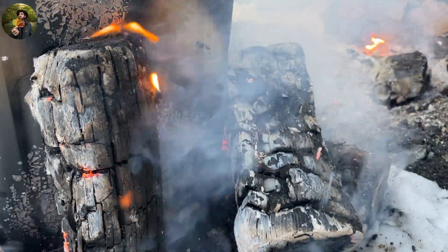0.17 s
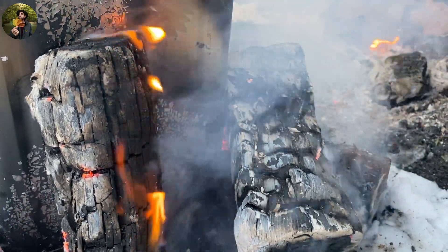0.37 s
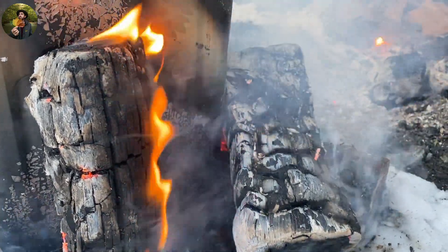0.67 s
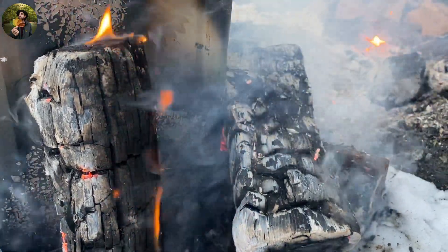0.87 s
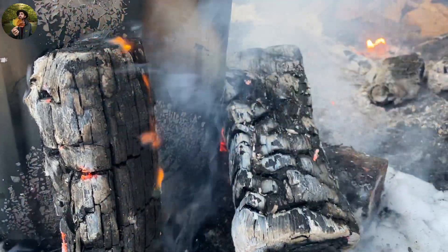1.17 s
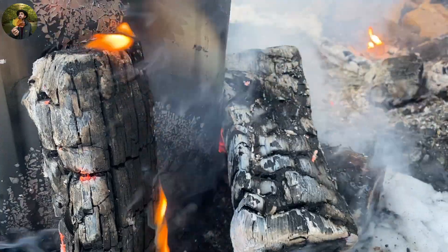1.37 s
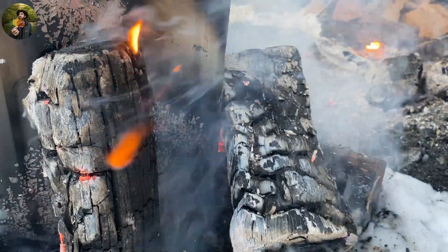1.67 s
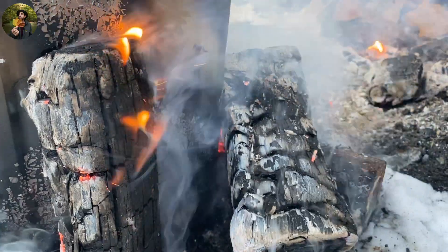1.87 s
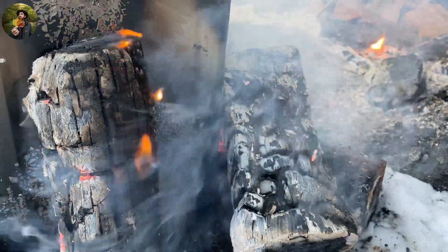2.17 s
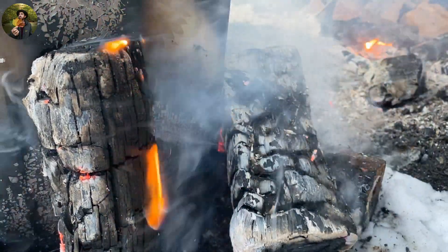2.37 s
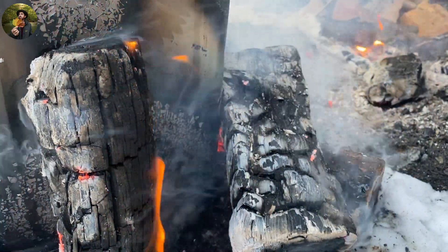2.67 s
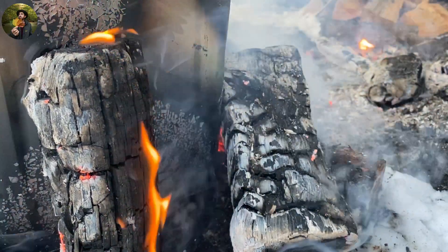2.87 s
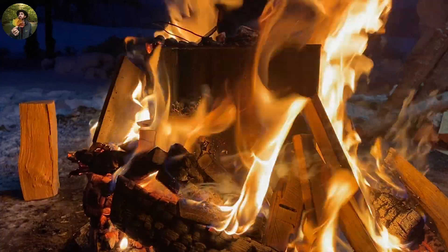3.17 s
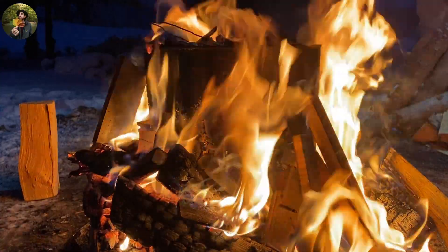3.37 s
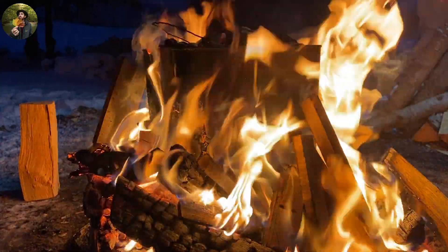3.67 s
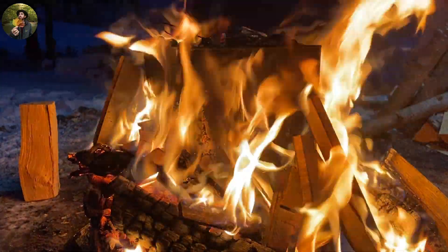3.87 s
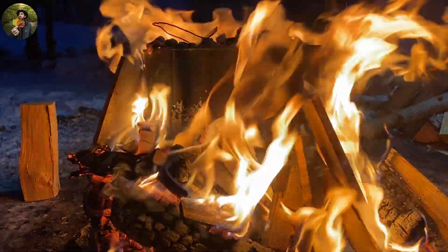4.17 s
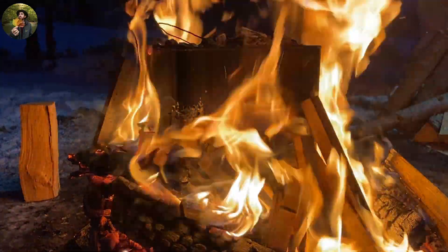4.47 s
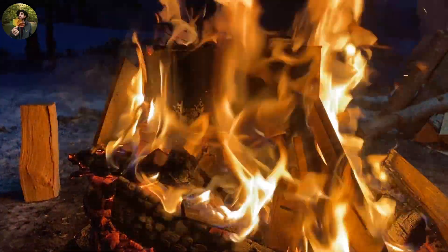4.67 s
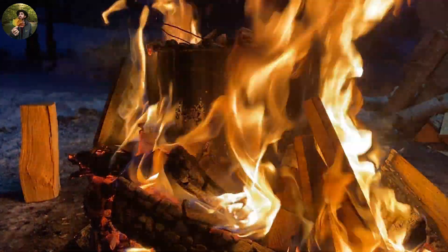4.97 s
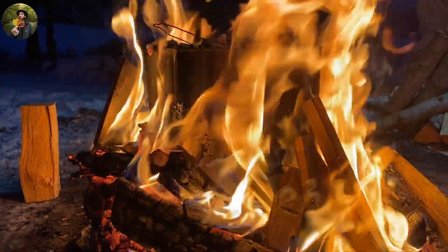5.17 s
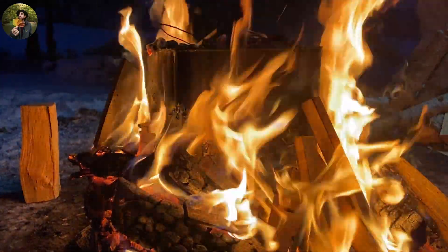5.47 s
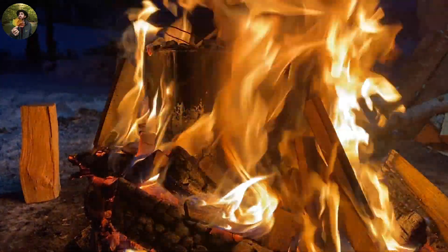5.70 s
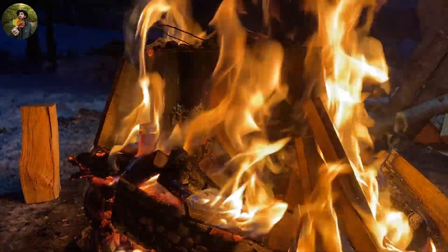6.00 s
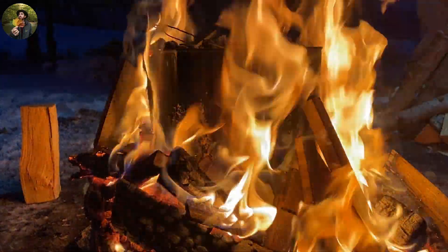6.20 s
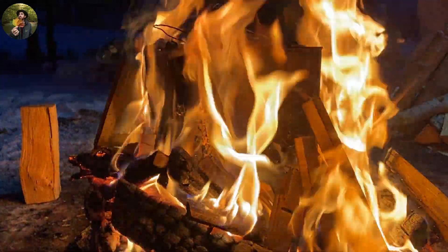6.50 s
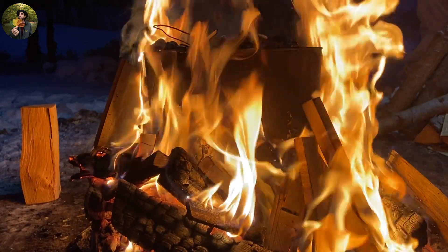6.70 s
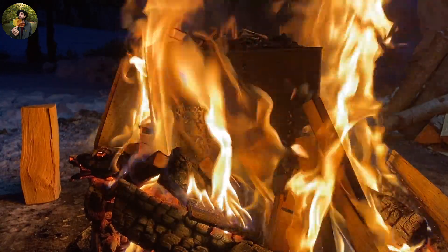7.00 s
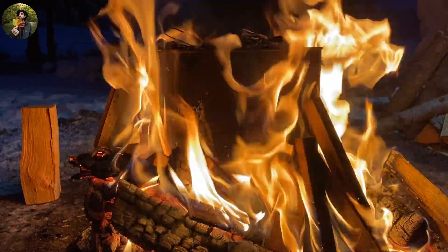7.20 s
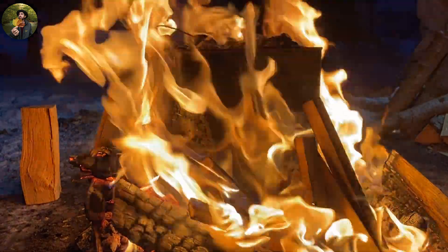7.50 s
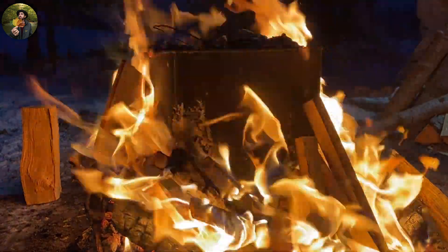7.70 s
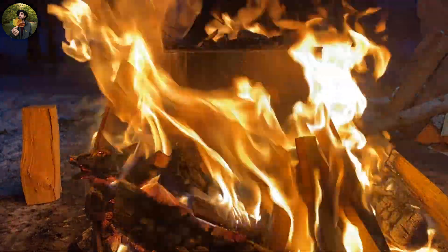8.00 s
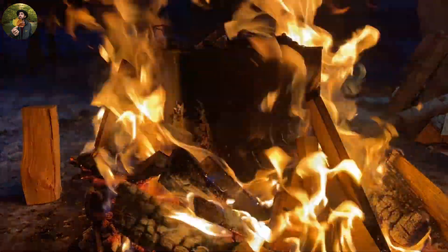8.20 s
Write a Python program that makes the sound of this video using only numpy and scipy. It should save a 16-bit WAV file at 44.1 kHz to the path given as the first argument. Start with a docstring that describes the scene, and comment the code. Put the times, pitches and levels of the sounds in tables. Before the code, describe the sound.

A wood fire outdoors, heard very close in stereo, in two parts. From 0 to 3.1 seconds charred logs smoulder: faint airy sizzling with tiny fizzing ticks, and small flames that flare and die in soft low flutters and short flaps. Deep puffs bunch around 0.8 to 1.1 seconds, the strongest low thumps of this part. Thin, dry, bright snaps come sparsely, with a clear cluster near 1.5 and others at 2.2 to 2.5. At 3.1 it cuts abruptly to a full blaze: a continuous deep, throbbing rumble with quick flutter and stronger hiss. Sharp millisecond cracks come often, notably at 3.8, 4.8, 5.15, 5.7, 6.8 and 8.1, some with hollow woody pops, especially 4.85 and 5.15. Heavy bass puffs swell around 6.1 and from 6.7 to 7.3. The hiss surges near 7.4 and 8.1; the blaze continues to the end, about 8.4. Dry, with only slight close reflections.

```python
"""A wood fire outdoors, close up: small flames flutter on charred, smouldering logs; a cut leads to a full blaze.
Flames are filtered noise: a throbbing rumble, a flickering flutter, torn flaps and puffs of one push and pull.
Fibres snap as millisecond noise bursts, with an echo and scatter; pops ring the modes of the hollow between logs.
Behind them sap hisses and fizzes, and the draught keeps the hollow faintly ringing.
Two microphone ports a few centimetres apart pick it up."""
import sys
import numpy as np
from scipy import signal
from scipy.fft import rfft, irfft
from scipy.io import wavfile
from scipy.ndimage import uniform_filter1d

SR = 44100
rng = np.random.default_rng(int(sys.argv[2]) if len(sys.argv) > 2 else 0)


def wav_record(signal):
    """Record a signal, one row per channel, as 16-bit PCM in the file named by sys.argv[1]."""
    frames = np.transpose(np.atleast_2d(signal))
    bounded = np.clip(frames, -1, 1)
    # unit amplitude maps onto the largest positive 16-bit level
    quanta = np.round(bounded * 32767).astype(np.int16)
    wavfile.write(sys.argv[1], SR, quanta)


N = 368182

CUT_S = 3.117  # smoulder before, blaze after
RECORDER_EDGE_HZ, STEAM_EDGE_HZ = 16700, 15850
FLARE_RISE_S, FLARE_FALL_S = 0.019, 0.023
EMBER_RUMBLE_DB, EMBER_FLUTTER_DB = -56.5, -68.5  # left between flares, before trim
TEARING_DB, TEARING_DRIFT_DB_PER_S = -11.5, -0.68  # blaze flutter re flame size, before trim; eases as it settles
SMOULDER_STEAM_DB = -63.5  # before the hiss and fizz trims
TIME_S, BIN_HZ = np.arange(N) / SR, np.fft.rfftfreq(N, 1 / SR)

# Steam from the blazing wood. Each row: time in seconds, level in dB before the hiss and fizz trims.
BLAZE_STEAM = [(3.13, -61.5), (3.48, -59.5), (4.66, -58.5), (5.5, -60.7), (6.6, -56.5), (7.08, -58.6),
               (7.37, -54.5), (7.93, -60), (8.11, -54.5), (8.35, -64)]
# Colour of rumble, flutter and hiss. Each row: frequency in Hz, relative level in dB per Hz.
SMOULDER_RUMBLE = [(15, -38), (30, -26), (50, -2.5), (80, -0.5), (125, -5), (180, -14.5), (260, -28),
                   (500, -67)]
BLAZE_RUMBLE = [(15, -50), (28, -27), (45, -4.5), (72, 0.5), (105, -4.5), (150, -8), (220, -17),
                (330, -27.5), (700, -65)]
SMOULDER_FLUTTER = [(100, -6), (190, 1), (300, -4), (420, -10.5), (600, -20), (900, -49), (2000, -55),
                    (4000, -61)]
BLAZE_FLUTTER = [(120, 1), (250, 0), (370, -1.5), (500, -6.5), (650, -10.5), (900, -13.5), (1400, -22),
                 (2500, -33), (5000, -65)]
SMOULDER_HISS = [(400, -4.5), (1000, -12), (2000, -7), (3000, -2.5), (4800, -1), (6200, 1), (7500, -2),
                 (9500, 1), (11500, -2.5), (15700, -1), (16100, -30)]
BLAZE_HISS = [(400, 7), (1400, -4), (2100, -3.5), (3300, 0.5), (4000, -1.5), (4800, 2), (6200, -4.5),
              (7700, 0.5), (9000, -2), (12000, -0.5), (15600, 0.5), (16100, -21)]
# Loud snaps of splitting fibres. Each row: time in seconds, level in dB before trim, ring in Hz,
# body under 3 kHz in dB, sizzle over 8 kHz in dB, decay in seconds.
LOUD_CRACKS = [(0.089, -41.5, 8100, -7.5, -3.5, 0.0007), (0.3095, -45.5, 6150, -20, 1, .0016),
               (0.3742, -43, 15300, -21, 7, .001), (0.8765, -38.5, 7700, -26, -2, 0.00062),
               (1.270, -41.5, 12600, -21, 8, .004), (1.5128, -42.5, 10200, -6, 9, .002),
               (1.5273, -34, 5240, -11, 2, 0.00071), (1.5603, -43.5, 3960, -6, -9, 0.0015),
               (2.1806, -38, 6740, -7, 5, 0.00054), (2.34, -40.5, 8150, -41, 5, 0.00057),
               (2.452, -47.5, 8400, -26, 0, .0012), (2.9077, -46.5, 12000, -13, 2, 0.0014),
               (3.3472, -31.5, 5640, 8, 2, 0.00048), (3.4025, -38.5, 13600, 10, 12, 0.00089),
               (3.779, -28.5, 2750, 1.5, 1.5, 0.00079), (4.0346, -42, 6900, -3, -1, .0013),
               (4.0704, -32.5, 15300, 4, -4, 0.00057), (4.2773, -44, 15200, 1, 21, 0.00045),
               (4.4142, -42, 9500, -15, 3, .0008), (4.29, -43, 4300, 5, -3, .0008),
               (4.501, -36.5, 14800, 6.5, .5, 0.00047), (4.8217, -44, 13400, -1, 2, .0006),
               (4.8359, -27.5, 15300, -0.5, 7.5, 0.00054), (4.8568, -40, 7000, 0, -5, 0.0056),
               (5.1451, -31.5, 3800, -1, -16, 0.0026), (5.1469, -33.5, 3100, 3, -1.5, .0021),
               (5.2587, -35.5, 12300, -3, 3.5, .0012), (5.3882, -43, 4700, 2, -2, .0008),
               (5.7301, -32, 13700, -1.5, 2.5, .0004), (5.7477, -35, 15000, -7, 8, .0006),
               (5.9513, -40.5, 9700, -10, 0, .001), (6.0769, -40, 15000, -2, 0.5, 0.0011),
               (6.2226, -41.5, 4100, -2, -10, .0036), (6.2712, -45.5, 4630, -3, -2, .001),
               (6.379, -39, 12200, -14, 1, 0.00085), (6.4516, -43.5, 6830, -2, -7, 0.00091),
               (6.5273, -40.5, 2580, 4, -5, 0.0017), (6.8062, -27, 13400, 0, 4, 0.00062),
               (6.8593, -39.5, 11600, 0, 5, 0.00062), (7.1517, -41.5, 4970, 1, 2, 0.00097),
               (7.455, -42.5, 2600, 6, 8, 0.00088), (7.7846, -42.5, 3300, 6, -13, 0.0056),
               (8.1038, -29.5, 13000, 5.5, -1, 0.00045)]
# Gas pockets flaring up. Each row: time in seconds, peak in dB before trim, pitch in Hz.
PUFFS = [(0.817, -29.5, 72), (.92, -25, 70), (0.97, -22, 84), (1.082, -26, 78), (1.106, -31, 110),
         (1.319, -31.5, 220), (2.331, -34, 420), (2.868, -35, 148), (3.354, -27, 76), (4.345, -28, 80),
         (6.07, -25.5, 90), (6.66, -22, 83), (6.9263, -20, 74), (7.155, -29, 74), (7.2656, -21, 71.5),
         (8.252, -28.5, 87)]
# Pops deep in the pile. Each row: time in seconds, level in dB before trim, centre in Hz,
# fall away from the centre in dB per octave.
POPS = [(2.07, -53.5, 3100, 20), (3.575, -44, 1170, 13), (3.7787, -57, 1200, 13), (4.8493, -40.5, 1000, 9),
        (4.858, -31.5, 970, 11), (5.1455, -31, 900, 0), (6.223, -46, 1800, 0), (6.528, -50, 1210, 15),
        (7.195, -49, 1650, 14), (8.104, -51, 887, -1)]
# Modes of the hollow between the logs. Each row: frequency in Hz, level in dB, t60 in seconds.
HOLLOW_MODES = [(622, -8.5, 0.044), (719, -4, 0.057), (1004, -1, 0.042), (1226, -5, 0.043),
                (1744, -14.5, 0.075), (1905, -17, 0.048), (2597, -7.5, 0.046), (3464, -2, 0.019),
                (3950, -0.5, 0.014)]
# The two ports. Each row: frequency in Hz, likeness 0-1, left lead in radians, left over right in dB.
PORTS = [(100, .96, 0, 0), (300, .92, 0, -1.2), (1000, .7, .3, 1.2), (2000, .45, .6, 2.8),
         (3300, .45, .6, 2.8), (5000, .3, .6, 1.6), (6800, .65, .1, .3), (7600, .7, -.8, .8),
         (9000, .95, -3.1, 0), (11000, .95, -6.2, 0), (11700, .7, -6.8, 0), (13300, .95, -9.4, 0),
         (15200, .92, -12.5, 0)]
# Flaps and short whooshes of the small flames that stand out. Each row: time in seconds, level in dB,
# length in seconds, reach in Hz.
CLEAR_FLAPS = [(.424, -47, 0.011, 563), (.546, -57, 0.042, 1100), (.619, -63, .09, 850),
               (.702, -57, .02, 854), (.935, -53.5, .015, 494), (1.322, -43, .011, 503),
               (1.352, -49.5, 0.018, 700), (1.581, -50.5, 0.012, 560), (1.781, -57, 0.0078, 1100),
               (1.824, -59, .01, 1110), (1.924, -57.5, 0.011, 1250), (2.115, -55.5, 0.013, 1050),
               (2.262, -51, .012, 590), (2.308, -46.5, 0.0088, 800), (2.331, -43.5, .004, 1100),
               (2.639, -52, .009, 527), (2.855, -50.5, 0.01, 720)]
# Small flames catching on the charred log. Each row: start in seconds, length in seconds,
# rumble in dB before trim, flutter in dB before trim.
FLARES = [(0.011, 0.021, -42.5, -49.5), (0.251, .26, -43.5, -51), (0.55, 0.036, -50.5, -55),
          (0.65, 0.11, -45, -58), (0.796, 0.035, -43, -65), (0.907, 0.1, -38, -69),
          (1.065, 0.034, -31, -48), (1.167, 0.022, -44, -50), (1.294, 0.05, -43.5, -49.5),
          (1.56, 0.032, -44, -58), (1.698, 0.27, -53, -58.5), (2.1, 0.097, -46, -56.5),
          (2.305, 0.1, -49, -49), (2.524, .17, -53, -53.5), (2.842, 0.044, -44.5, -52),
          (3.055, 0.023, -53, -59)]
# Size of the tall flames. Each row: time in seconds, level in dB before trim.
BLAZE_SIZE = [(3.12, -40.5), (3.62, -37.5), (3.95, -40.5), (4.36, -36), (4.53, -39.5), (5.0, -37),
              (5.58, -42.5), (5.74, -39.5), (6.25, -38.5), (6.45, -41.5), (6.85, -39), (7.42, -43.5),
              (7.58, -35.5), (7.9, -44), (8.1, -38.5), (8.35, -38)]


def amp(db):
    """Decibels to gain."""
    return 10 ** (np.asarray(db) / 20)


def unit(x):
    """Scales to rms 1."""
    return x / np.sqrt(np.mean(x ** 2) + 1e-20)


def read(points, hz, axis=1):
    """Interpolates one table column on a log-frequency axis."""
    table = np.array(points, float)
    return np.interp(np.log(hz + 1), np.log(table[:, 0] + 1), table[:, axis])


def follow(rows):
    """Interpolates a (seconds, dB) table at every sample."""
    return np.interp(TIME_S, *np.transpose(rows))


def colour(x, spectrum):
    """Filters a sound by a (Hz, dB) spectrum."""
    size = x.shape[-1]
    gain = amp(read(spectrum, np.fft.rfftfreq(size, 1 / SR)))
    return irfft(rfft(x) * gain, size)


def noise():
    """Two rows of white noise: the part both ports share, the part that sets them apart."""
    return rng.standard_normal((2, N))


def wander(rate_hz):
    """Smooth random curve of rms 1: noise under a Gaussian low-pass."""
    lowpass = np.exp(-(BIN_HZ / rate_hz) ** 2)
    return unit(irfft(rfft(rng.standard_normal(N)) * lowpass, N))


def add(mix, start_s, sound):
    """Mixes a sound in at a time, cut at the end of the mix."""
    part = mix[:, max(round(start_s * SR), 0):][:, :sound.shape[-1]]
    part += sound[..., :part.shape[1]]


def surroundings(x, echo_s, echo_db, scatter_db, t60_s):
    """One echo from a surface nearby and a short scatter off logs and ground."""
    t = np.arange(SR // 5) / SR
    decay = np.exp(-np.log(1000) * t / t60_s)
    tail = rng.standard_normal((2, len(t))) * decay * (t > .002)
    tail = amp(scatter_db) * unit(tail) / np.sqrt(len(t))
    tail[:, round(echo_s * SR)] += amp(echo_db)
    return x + signal.oaconvolve(x, tail, axes=1)[:, :N]


def ports(x):
    """Turns the shared and differing parts into left and right; the treble reaches the left port later."""
    shared, apart = rfft(x)
    likeness = np.clip(read(PORTS, BIN_HZ), 0, 1)
    shared = shared * np.sqrt((1 + likeness) / 2)
    apart = apart * np.sqrt((1 - likeness) / 2)
    lead_rad, left_over_right_db = read(PORTS, BIN_HZ, axis=2), read(PORTS, BIN_HZ, axis=3)
    lean = np.exp(.5j * lead_rad) * amp(left_over_right_db / 2)  # half on each port
    return irfft(np.array([(shared + apart) * lean, (shared - apart) / lean]), N)


def hollow_ring(centre_hz, fall_db):
    """Dying modes of the hollow, strongest near the centre when fall_db is positive, with energy 1."""
    t = np.arange(4096) / SR
    ring = np.zeros((2, len(t)))
    for hz, db, t60_s in HOLLOW_MODES:
        octaves = abs(np.log2(hz / centre_hz))
        decay = amp(db - fall_db * octaves - 60 * t / t60_s)
        ring += decay * np.sin(2 * np.pi * (hz * t + rng.random((2, 1))))
    return unit(ring) / np.sqrt(len(t))


def draught(level_db, swell_db):
    """The roar of the blaze keeps the hollow faintly ringing: swelling noise through its modes."""
    air = noise() * amp(swell_db * wander(35))
    ringing = signal.oaconvolve(air, hollow_ring(centre_hz=1000, fall_db=1.5), axes=1)[:, :N]
    return amp(level_db) * unit(ringing)


def steam(level_db, spectrum, hiss_trim_db, sputter_db, fizz_trim_db, ticks_per_s, spread_db, tick_s, tick_body_db):
    """Sap boils out in a sputtering hiss, among countless tiny bursts of uneven size."""
    sputter = amp(sputter_db * wander(75) + .5 * wander(7.6))
    hiss = unit(colour(noise() * sputter, spectrum))
    t, fizz = np.arange(256) / SR, np.zeros((2, N))
    shapes = rng.standard_normal(size=(64, 2, len(t))) * np.exp(-t / tick_s)
    for when, chance, shape in rng.random((round(ticks_per_s * N / SR), 3)):
        size_db = spread_db * min(-np.log(chance + 1e-9), 4)  # many small, few large
        add(fizz, when * N / SR, amp(size_db) * shapes[int(shape * len(shapes))])
    fizz = colour(colour(fizz, spectrum), [(2000, tick_body_db), (6000, 0)])  # tiny bursts have little body
    both = amp(hiss_trim_db) * hiss + amp(fizz_trim_db) * unit(fizz)
    return irfft(rfft(both) * (BIN_HZ < STEAM_EDGE_HZ), N) * amp(level_db)


def small_cracks(start_s, end_s, steam_db, per_s, over_steam_db, spread_db, body_db, sizzle_db, decay_s):
    """Lesser fibres snap at random, louder where the sap boils harder; rows like LOUD_CRACKS."""
    draws = rng.random((round(per_s * (end_s - start_s)), 5))
    rows = []
    for k, (when, size, ring, body, decay) in enumerate(draws):
        s = start_s + (end_s - start_s) * (k + when) / len(draws)  # one per equal slot
        db = np.interp(s, TIME_S, steam_db) + over_steam_db + spread_db * (size - .5)
        ring_hz = 4500 + 11000 * ring
        rows.append((s, db, ring_hz, body_db + 18 * (body - .5), sizzle_db, decay_s * (.5 + decay)))
    return rows


def cracks(rows, trim_db, rise_s, rattle_db, rattle_s, ring_db, ring_width_hz):
    """A fibre snaps in about a millisecond, coloured by the splinter's broad ring; the char rattles on a little."""
    out, t = np.zeros((2, N)), np.arange(-128, 1920) / SR
    age_s, hz = np.maximum(t, 0), np.fft.rfftfreq(len(t), 1 / SR)
    for s, db, ring_hz, body_db, sizzle_db, decay_s in rows:
        snap_decay = np.exp(-age_s / max(decay_s, 1e-4))
        rattle = amp(rattle_db) * np.exp(-age_s / rattle_s)
        shape = (1 - np.exp(-age_s / rise_s)) * (snap_decay + rattle)
        tone = [(120, body_db + 4.5), (450, body_db), (1400, body_db - 1.5), (2000, body_db - 3.0),
                (2800, body_db / 2), (4000, 0), (7000, 0), (10000, sizzle_db), (16000, sizzle_db - 7.0)]
        splinter = amp(ring_db * np.exp(-((hz - ring_hz) / ring_width_hz) ** 2))
        burst = rfft(shape * rng.standard_normal((2, len(t))))
        # even out the burst's spectrum so that ring and tone set its colour
        burst /= np.sqrt(uniform_filter1d(abs(burst) ** 2, size=51, axis=1) + 1e-20)
        snap = colour(irfft(burst * splinter), tone)
        snap /= np.sqrt(np.sum(snap ** 2, axis=1, keepdims=True) / (.004 * SR))  # energy of 4 ms at rms 1
        add(out, s + t[0], amp(db + trim_db) * snap)
    return out


def pops(trim_db):
    """A steam pocket bursts inside the pile and knocks on the hollow."""
    out = np.zeros((2, N))
    for s, db, centre_hz, fall_db in POPS:
        ring = np.sqrt(.01 * SR) * hollow_ring(centre_hz, fall_db)  # energy of 10 ms at rms 1
        add(out, s, amp(db + trim_db) * ring)
    return out


def puffs(trim_db, cycles):
    """A pocket of gas swells and collapses: one push and one pull of air, in the shared row only."""
    out, t = np.zeros((2, N)), np.arange(-2048, 2048) / SR
    for s, db, hz in PUFFS:
        window = np.exp(-(hz * t / cycles) ** 2)
        add(out[:1], s + t[0], -amp(db + trim_db) * np.sin(2 * np.pi * hz * t) * window)
    return out


def small_flaps(flutter_db, per_s, under_db, spread_db, length_s, reach_hz):
    """Lesser tears come at random, their level following the flutter; rows like CLEAR_FLAPS."""
    rows = []
    for when, size, reach in rng.random((round(per_s * CUT_S), 3)):
        s = when * CUT_S
        db = np.interp(s, TIME_S, flutter_db) + under_db - spread_db * size
        rows.append((s, db, length_s, reach_hz * (.5 + reach)))
    return rows


def flaps(rows, droop_db, fall_db, ragged_db):
    """A flame tip tears off with a flap of noise; each tear has its own length and reach."""
    out, t = np.zeros((2, N)), np.arange(-4096, 4096) / SR
    for s, db, length_s, reach_hz in rows:
        swell = np.exp(-2 * (t / length_s) ** 2)
        tone = [(120, -25), (330, 0), (max(reach_hz, 400), droop_db), (4 * reach_hz, droop_db + 2 * fall_db)]
        air = colour(rng.standard_normal((2, len(t))), tone)
        jerks = unit(uniform_filter1d(rng.standard_normal(len(t)), size=200))  # the tear runs in a few jerks
        flap = swell * air * amp(ragged_db * jerks)
        flap *= np.linalg.norm(swell) / np.linalg.norm(flap, axis=1, keepdims=True)
        add(out, s + t[0], amp(db) * flap)
    return out


def flaring(ember_db, axis):
    """Level in dB of the small flames: each flare rises quickly, holds and dies back to the embers."""
    power = amp(ember_db) ** 2
    for flare in FLARES:
        start_s, length_s = flare[:2]
        before = np.maximum(start_s - TIME_S, 0) / FLARE_RISE_S
        after = np.maximum(TIME_S - start_s - length_s, 0) / FLARE_FALL_S
        power = power + (amp(flare[axis]) * np.exp(-np.minimum(before + after, 20))) ** 2
    return 10 * np.log10(power)


def flames(rumble_level_db, flutter_level_db, rumble_spectrum, flutter_spectrum,
           rumble_trim_db, throb_db, flutter_trim_db, flicker_db, flicker_hz):
    """Uneven burning rumbles in slow throbs; the flame tips tear in quick bursts that reach higher."""
    throb = throb_db * wander(19.4)
    rumble = colour(noise(), rumble_spectrum)
    # level the noise, so that the flame's size sets its loudness
    rumble /= np.sqrt(uniform_filter1d(rumble ** 2, size=5000, axis=1) + 1e-20)
    rumble *= unit(amp(throb))
    flicker = flicker_db * wander(flicker_hz)
    flutter = unit(colour(noise() * amp(throb + flicker), flutter_spectrum))
    return rumble * amp(rumble_level_db + rumble_trim_db) + flutter * amp(flutter_level_db + flutter_trim_db)


def scene():
    """The smouldering logs, then the blaze, with their snaps, pops and puffs."""
    steam_db = np.where(TIME_S < CUT_S, SMOULDER_STEAM_DB, follow(BLAZE_STEAM))

    rumble_db, flutter_db = flaring(EMBER_RUMBLE_DB, axis=2), flaring(EMBER_FLUTTER_DB, axis=3)
    smoulder = flames(rumble_db, flutter_db, SMOULDER_RUMBLE, SMOULDER_FLUTTER, rumble_trim_db=-0.5,
                      throb_db=1.9, flutter_trim_db=0.5, flicker_db=5.5, flicker_hz=52.3)
    tears = CLEAR_FLAPS + small_flaps(flutter_db, per_s=14, under_db=-2.5, spread_db=5,
                                      length_s=0.0072, reach_hz=593)
    smoulder += flaps(tears, droop_db=-14.5, fall_db=-24.0, ragged_db=2.5)
    smoulder += steam(steam_db, SMOULDER_HISS, hiss_trim_db=2.5, sputter_db=2.04, fizz_trim_db=-2.5,
                      ticks_per_s=250, spread_db=4.0, tick_s=0.00085, tick_body_db=-10.0)

    size_db = follow(BLAZE_SIZE)
    tearing_db = size_db + TEARING_DB + TEARING_DRIFT_DB_PER_S * (TIME_S - CUT_S)
    blaze = flames(size_db, tearing_db, BLAZE_RUMBLE, BLAZE_FLUTTER, rumble_trim_db=0.85,
                   throb_db=1.47, flutter_trim_db=2.5, flicker_db=2.5, flicker_hz=52.0)
    blaze += steam(steam_db, BLAZE_HISS, hiss_trim_db=3.5, sputter_db=2.5, fizz_trim_db=-2.6,
                   ticks_per_s=260, spread_db=2.0, tick_s=0.00055, tick_body_db=-1.5)
    blaze += draught(level_db=-63.0, swell_db=3.5)

    fibres = LOUD_CRACKS + small_cracks(0, CUT_S, steam_db, per_s=2.5, over_steam_db=12.5, spread_db=6,
                                        body_db=-11, sizzle_db=5, decay_s=0.00092)
    fibres += small_cracks(CUT_S, N / SR, steam_db, per_s=4, over_steam_db=12.5, spread_db=7.5,
                           body_db=-1, sizzle_db=5.5, decay_s=0.00076)
    snaps = cracks(fibres, trim_db=-1.44, rise_s=0.00029, rattle_db=-36, rattle_s=0.008,
                   ring_db=7.5, ring_width_hz=1850)
    snaps = surroundings(snaps, echo_s=.0092, echo_db=-21, scatter_db=-14, t60_s=.04)

    fire = np.where(TIME_S < CUT_S, smoulder, blaze)
    return ports(fire + snaps + pops(trim_db=-0.8) + puffs(trim_db=-1.5, cycles=0.68))


def record(dry):
    """Band limit of the recorder: a steep linear-phase low-pass."""
    lowpass = signal.firwin(511, RECORDER_EDGE_HZ, window=("kaiser", 9), fs=SR)
    return signal.oaconvolve(dry, lowpass[None], "same")


dry = scene()
out = record(dry)
wav_record(out)
```